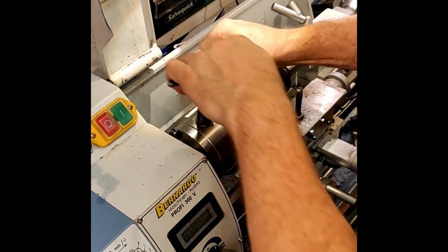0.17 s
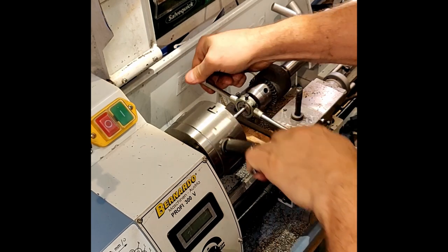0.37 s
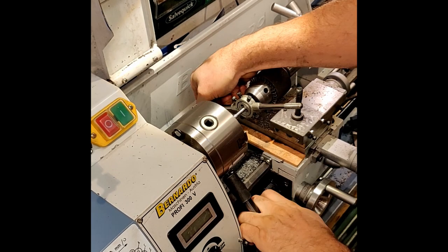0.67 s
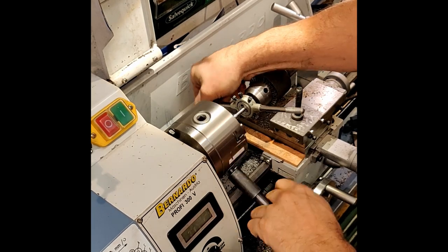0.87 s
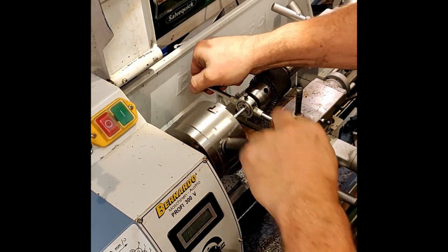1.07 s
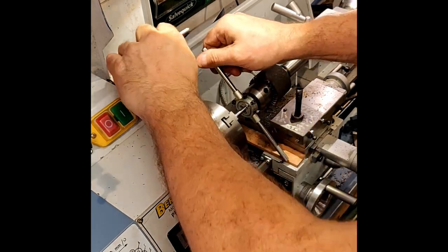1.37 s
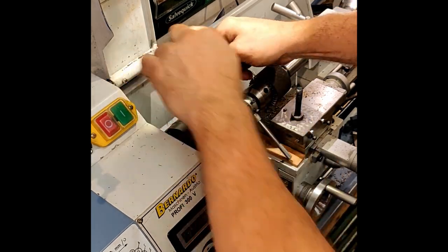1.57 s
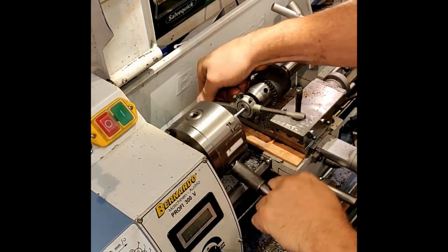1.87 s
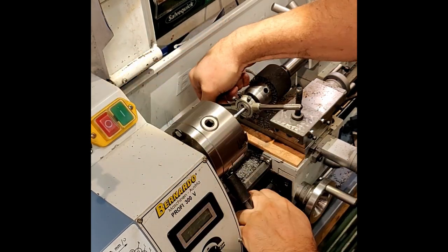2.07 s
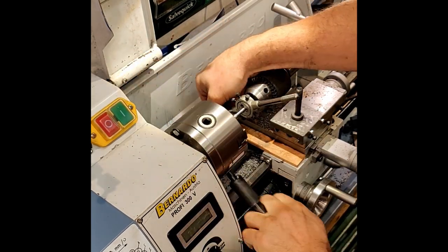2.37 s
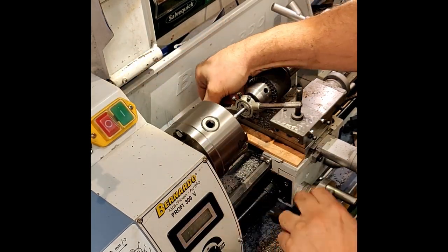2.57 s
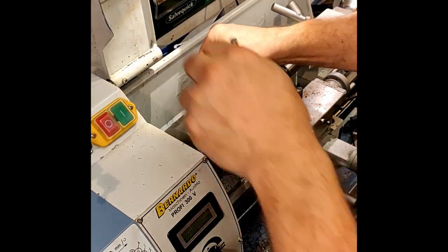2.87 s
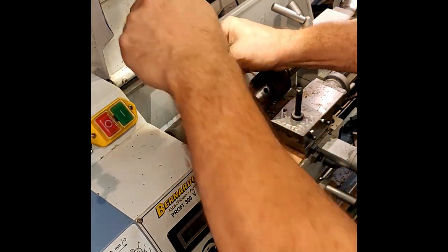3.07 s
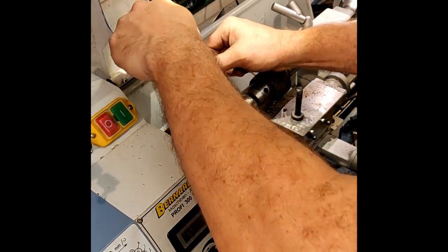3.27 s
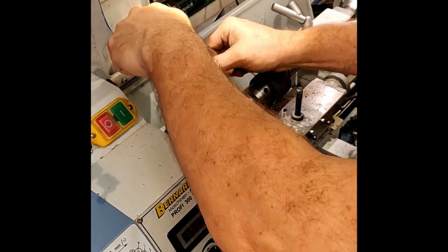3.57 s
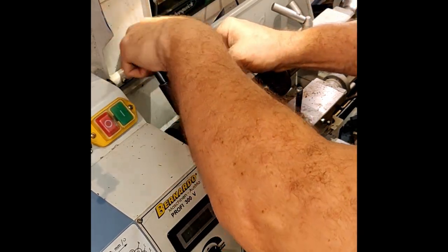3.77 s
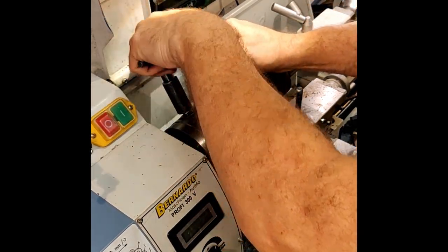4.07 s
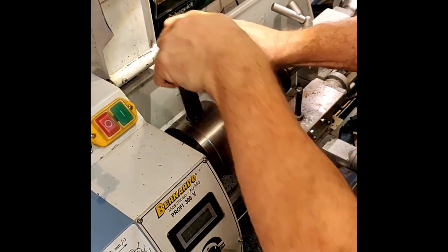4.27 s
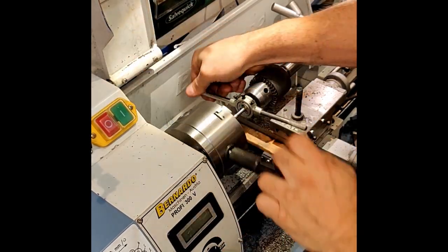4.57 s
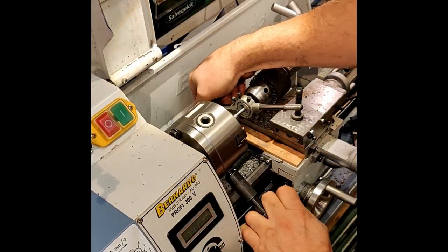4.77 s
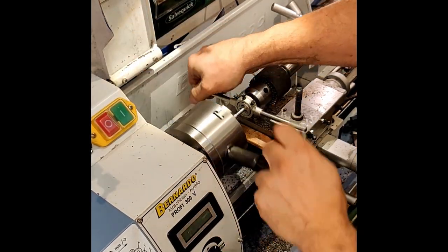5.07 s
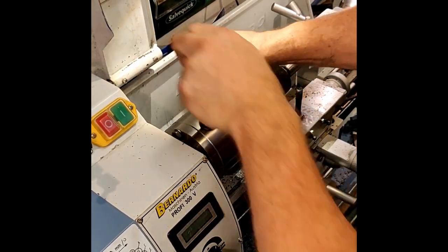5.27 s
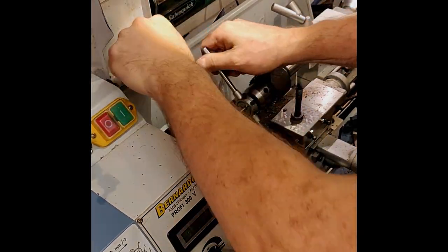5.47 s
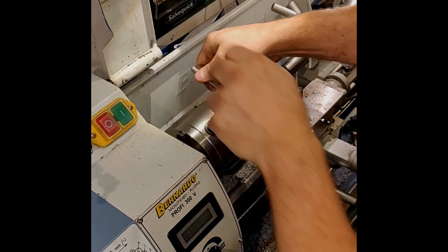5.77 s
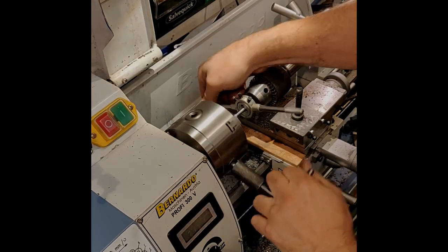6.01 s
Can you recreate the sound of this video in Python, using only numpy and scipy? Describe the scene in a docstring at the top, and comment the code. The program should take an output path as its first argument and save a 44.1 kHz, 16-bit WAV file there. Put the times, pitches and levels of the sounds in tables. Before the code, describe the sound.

Irregular sharp metal clacks with brief bright ringing and dull hollow booms, loose steel tapping and faint rubbing hiss, close up in a workshop.

```python
"""A thread is cut by hand on a stopped lathe in a small, dry workshop, one hand on the die, one on the key.
The key knocks, clacks home and scrapes; struck steel rings, and the headstock booms in its low modes.
From the start the die hisses by dense stick and slip at each turn; loose steel taps during turns and between.
Near 0.8 s the die rasps and whistles for a moment; short pings, further turns and blows follow to the end.
Still air and low microphone rumble lie under everything."""
import sys
import numpy as np
from scipy import signal
from scipy.fft import rfft, irfft
from scipy.io import wavfile

SR = 44100
rng = np.random.default_rng(int(sys.argv[2]) if len(sys.argv) > 2 else 0)


def materialize(psi):
    """Save the field psi as 16-bit PCM at rate SR to the path in sys.argv[1].

    A 1-D psi becomes a single channel; in a 2-D psi each row is a channel.
    """
    bounded = np.clip(np.atleast_2d(psi).T, -1, 1)
    quanta = np.round(bounded * 32767).astype(np.int16)
    wavfile.write(sys.argv[1], SR, quanta)


N = 270774
TIME = np.arange(N) / SR  # seconds through the scene
AGE = np.arange(SR // 2) / SR  # seconds since a blow
EDGE_HZ = 16200  # upper band limit

# Event levels are relative: each source function adds its own trims in dB.
# The key strikes home: start_s, steel_db, ring_centre_hz, boom_db, boom_pitch_hz, crack_db, left_minus_right_db
KEY_CLACKS = [(0.0942, -13, 6410, -32, 326, -33.5, 1.5), (1.3493, -8, 6430, -31, 460, -31.5, 5),
              (3.0996, -13, 6080, -31, 326, -34, 3.5), (3.8766, -21, 5200, -26, 292, -33, 4.5),
              (4.219, -30, 6160, -42.5, 410, -39.5, 2.5), (5.507, -7, 6500, -31, 363, -29.5, 1.5)]
# The key shifts in its socket: start_s, boom_db, boom_pitch_hz, crack_db
KEY_KNOCKS = [(0.002, -26, 198, -46.5), (0.816, -31, 306, -53), (1.05, -43.5, 270, -53),
              (1.557, -24, 297, -46), (2.148, -31.5, 236, -40), (2.333, -43.5, 204, -71),
              (2.383, -40, 242, -78), (3.454, -29, 276, -47.5), (3.58, -39, 282, -42),
              (3.634, -31, 393, -40), (3.782, -25.5, 265, -42), (4.087, -38, 256, -78),
              (4.168, -30, 221, -59.5), (4.405, -40, 276, -68), (4.831, -32.5, 200, -59),
              (4.948, -34.5, 287, -58.5), (5.008, -26, 186, -40), (5.028, -28.5, 199, -61),
              (5.2, -31.5, 222, -58), (5.568, -24, 198, -46.5), (5.942, -39, 199, -60.5)]
# After a knock the key drops back once, more softly
REBOUND_S, REBOUND_DB = 0.029, -9.5
# The key touches the chuck, too lightly to shake the headstock: start_s, level_db
KEY_TOUCHES = [(1.493, -57), (2.303, -60), (4.53, -54), (5.128, -55), (5.457, -58)]
# The key rings briefly as it shifts or leaves a socket: start_s, pitch_hz, level_db, t60_s
KEY_PINGS = [(1.053, 7300, -51, 0.076), (1.575, 5860, -51, 0.18), (1.627, 4740, -51.5, 0.11),
             (3.641, 3500, -41.5, 0.033), (5.009, 7350, -36, 0.097), (5.752, 4710, -54, 0.16)]
# The key drags along a socket wall: start_s, length_s, boom_db, grit_db
WALL_SCRAPES = [(0.0, 0.068, -41, -58), (0.821, 0.046, -39, -51.5), (2.43, 0.03, -43.5, -48),
                (3.459, 0.16, -39, -61.5), (3.602, 0.068, -36.5, -49.5), (3.791, 0.036, -31.5, -42.5),
                (3.844, 0.048, -32.5, -81), (4.172, 0.063, -44, -79), (4.997, 0.014, -44, -32.5),
                (5.52, 0.068, -35, -57)]
# Loose steel taps, during the turns and between them: start_s, tap_db, thin_ring_db
LOOSE_TAPS = [(0.077, -38.5, -42.5), (0.615, -47, -80), (0.6947, -48.5, -73), (0.856, -39.5, -54),
              (1.724, -40.5, -57.5), (1.7836, -46.5, -74), (1.9449, -40, -55.5), (2.0502, -43.5, -65),
              (2.0941, -43, -54.5), (2.4371, -41, -53), (4.1826, -41.5, -61), (4.7825, -40, -70),
              (4.9832, -39.5, -44), (5.2703, -47, -59), (6.0005, -43.5, -75), (6.1045, -44, -59.5)]
# Loose steel taps after a knock: delay_s, tap_db, thin_ring_db (levels relative to boom_db)
KNOCK_JOLT_OFFSET = (0.018, -19, -35)
# Loose steel taps after a clack: delay_s, tap_db, thin_ring_db (levels relative to boom_db)
CLACK_JOLT_OFFSET = (.034, -17.5, -29.5)
# Faint chatter of loose steel at random moments of each turn, levels relative to the turn
CHATTER_PER_S, CHATTER_DB, CHATTER_RING_DB, CHATTER_SPREAD_DB = 14, 3, -11, 2
# The chuck is pulled round and the die rubs on the rod: start_s, length_s, level_db
CHUCK_TURNS = [(0.0, 0.87, -60.5), (0.76, 0.46, -59), (1.52, 0.41, -60.5), (2.58, 0.64, -62.5),
               (4.32, 0.56, -59.5), (5.03, 0.6, -61.5), (5.72, 0.31, -58)]
TURN_ATTACK_S, TURN_RELEASE_S = 0.07, 0.17
CREEP_DB = -69.5  # between turns the die barely moves
# The die rasps and sings where it bites hardest: time_s, pitch_hz, level_db
DIE_SQUEAK = [(.82, 6500, -59), (0.889, 6680, -58), (0.972, 6670, -56.5), (1.021, 6550, -60.5),
              (1.12, 6330, -67)]
# Handling rumble through the scene: time_s, level_db
RUMBLE_LEVEL = [(0.0, -45), (0.58, -48.5), (2.22, -46), (2.77, -54.5), (5.3, -43.5), (5.44, -46),
                (5.68, -38.5), (6.14, -48.5)]

# Modes of the headstock and its sheet-metal covers: pitch_hz, level_db, t60_s
HEADSTOCK_MODES = [(189.4, -15, 0.099), (200, 4.5, 0.2), (257.6, 2.5, 0.12), (277.1, 1.5, 0.24),
                   (332, -15, 0.21), (403.8, 5, 0.15), (436, -29, .1), (560, -29, 0.15), (589, -0.5, 0.4),
                   (600, -13.5, .14), (713, -14.5, 0.48)]
# Modes of the key and chuck jaws: pitch_hz, level_db, t60_s
STEEL_MODES = [(5855, -12, 0.053), (5770, -1, 0.13), (5700, -12, 0.36), (6200, 21.5, 0.047),
               (6200, 13.5, 0.16), (6640, -5.5, .14), (7500, -23, .15), (7300, -3.5, .13),
               (7550, -19.5, 0.069)]

# Burst of struck steel: ratio to the ring centre (no unit), gain_db
BURST_COLOUR = [(.3, -61), (.72, -57), (.8, -38.5), (.87, -4), (.95, -3), (1.08, -3), (1.18, -10),
                (1.25, -20.5), (1.35, -33), (1.65, -50), (1.85, -42), (2.4, -47)]
# Snap of steel on steel: frequency_hz, gain_db
CRACK_COLOUR = [(150, -46), (500, 3.5), (1000, 8.5), (1800, 4.5), (3300, 8.5), (4300, 4.5), (6000, 11),
                (7500, 5.5), (9000, -11.5), (10500, -43.5), (12000, -15), (16000, -26)]
# Upper body of a hard blow: frequency_hz, gain_db
CLUNK_COLOUR = [(150, -32), (380, -18.5), (560, 8), (700, -12.5), (830, -7.5), (1050, -8), (1400, -10.5),
                (4000, -55.5)]
# Dull thud of the headstock: frequency_hz, gain_db
THUD_COLOUR = [(40, -20), (140, -21.5), (200, -0.5), (290, 2.5), (420, -13.5), (520, -13.5), (640, -9),
               (800, -24), (1500, -25.5), (4000, -74)]
# Tap of loose steel: frequency_hz, gain_db
TAP_COLOUR = [(100, -20), (300, 10), (520, 2.5), (750, 3), (1100, 5.5), (1800, 4), (2300, -7.5),
              (3200, -18.5), (5000, -15), (6500, -7.5), (8000, -34.5), (11000, -57.5)]
# Hiss of the die: frequency_hz, gain_db
RUBBING_COLOUR = [(300, -14.5), (1200, -12), (3000, -17), (4600, -11), (6500, -8.5), (7500, -14),
                  (9000, -33), (12000, -33.5)]
# Rasp of the biting die: frequency_hz, gain_db
RASP_COLOUR = [(2500, -41), (3900, -9), (4600, -2), (6600, 1), (7400, -6), (8500, -31)]
# Still room air: frequency_hz, gain_db
AIR_COLOUR = [(20, -13.5), (45, -14), (80, -19), (130, -31), (200, -8.5), (300, -14.5), (430, -12),
              (700, -20), (1500, -26.5), (3000, -27.5), (7000, -27.5), (10000, -39), (12500, -36.5),
              (16000, -36.5)]
# Microphone rumble: frequency_hz, gain_db
RUMBLE_COLOUR = [(8, 7), (20, 1), (50, -7), (90, -15.0), (160, -25.0), (500, -63.5)]


def amp(db):
    """Decibel law: 20 dB is a factor of ten in amplitude."""
    return 10 ** (np.asarray(db) / 20)


def unit(x):
    """Power normalisation: scales a steady sound to rms 1."""
    return x / np.sqrt(np.mean(x ** 2) + 1e-20)


def unit_hit(x):
    """Energy normalisation: scales a blow to the energy of 20 ms at rms 1."""
    energy = np.mean(np.sum(x ** 2, -1))
    return x / np.sqrt(energy / (SR / 50) + 1e-20)


def pan(db):
    """Interaural level difference: left and right gains that differ by db."""
    return amp([[db / 2], [-db / 2]])


def add(mix, s, sound):
    """Superposition: adds a stereo sound at time s, in place."""
    part = mix[:, max(round(s * SR), 0):][:, :sound.shape[-1]]
    part += sound[..., :part.shape[1]]


def colour(x, points, size=4096):
    """Minimum-phase filtering: a causal response derived from the log gain at the given points."""
    hz, db = np.transpose(points)
    grid_hz = abs(np.fft.fftfreq(size, 1 / SR)) + 1
    log_gain = np.log(amp(np.interp(np.log(grid_hz), np.log(hz), db)))
    # the Hilbert transform of the log gain gives the causal phase
    response = np.exp(np.conj(signal.hilbert(log_gain)))
    impulse = np.fft.ifft(response).real[:size // 2]
    return signal.oaconvolve(x, impulse[None], axes=1)[:, :x.shape[1]]


def noise(count, shared_hz=1100):
    """Spatial coherence: noise at two close microphones is alike in the bass, unrelated in the treble."""
    left, other = rfft(rng.standard_normal((2, count)))
    same = 1 / (1 + (np.fft.rfftfreq(count, 1 / SR) / shared_hz) ** 4)
    right = same * left + np.sqrt(1 - same ** 2) * other
    return irfft(np.array([left, right]), count)


def arrival(near_db, room_db, room_t60, near_t60=0.056, gap=0.00032):
    """Impulse response: direct sound, then scattering by the machine and decaying room reflections."""
    direct = np.zeros((2, len(AGE)))
    direct[0, 0] = direct[1, 2] = 1  # left leads by two samples
    scatter = noise(len(AGE), shared_hz=814) * (1 - np.exp(-(AGE / gap) ** 2))
    near = unit_hit(scatter * amp(-60 * AGE / near_t60))
    reflections = noise(len(AGE), shared_hz=600) * (AGE > gap)
    room = unit_hit(reflections * amp(-60 * AGE / room_t60))
    return unit_hit(direct) + amp(near_db) * near + amp(room_db) * room


def ring(modes, spread, vary_db):
    """Modal superposition: dying sines, reweighted at each blow; spread (radians) parts the two sides."""
    out = 0
    for k, (hz, db, t60) in enumerate(modes):
        phase = k * np.pi + spread * rng.standard_normal((2, 1))  # alternating sign
        decay = amp(db + vary_db * rng.standard_normal() - 60 * AGE / t60)
        out = out + decay * np.sin(2 * np.pi * hz * AGE + phase)
    return unit_hit(out)


def slips(count, per_s, uneven_db):
    """Stick and slip: friction yields a random train of small jerks of unequal size."""
    size_db = uneven_db * np.minimum(rng.exponential(1, count), 3)
    size = amp(size_db) * rng.choice([-1, 1], count)
    happens = rng.random(count) < per_s / SR
    return (size * happens)[None]


def clacks(burst_db=-10, modes_db=-21, boom_db=-2, clunk_db=-5, crack_db=-1):
    """Hard impact: short contact excites a burst, lingering steel modes, a snap, a clunk and the boom."""
    out = np.zeros((2, N))
    for s, db, hz, low_db, low_hz, snap_db, side_db in KEY_CLACKS:
        heard = arrival(near_db=-2, room_db=-4, room_t60=0.16, near_t60=0.035, gap=0.0012)
        burst = unit_hit(colour(heard, np.multiply(BURST_COLOUR, [hz, 1])))
        modes = ring(STEEL_MODES, spread=1.2, vary_db=2.5) * (1 - np.exp(-AGE / 0.002))
        steel = amp(burst_db) * burst + amp(modes_db) * modes
        snap = amp(crack_db) * crack(wet_db=-1)
        # only a short, hard contact reaches the upper modes of the casting
        casting = arrival(near_db=6, room_db=8, room_t60=0.16, gap=0.002)
        clunk = amp(clunk_db) * unit_hit(colour(casting, CLUNK_COLOUR))
        add(out, s, pan(side_db) * (amp(db) * steel + amp(snap_db) * (snap + clunk)))
        add(out, s, amp(low_db + boom_db) * boom(low_hz))
    return out


def boom(hz, rise=0.00067, focus_db=12, modes_db=-1, thud_db=-5, modes_side_db=5.0, thud_side_db=2):
    """Modal excitation: the place of the blow favours headstock modes near hz, over a dull thud."""
    # focus_db is lost per octave away from hz
    favoured = [(f, db - focus_db * abs(np.log2(f / hz)), t60) for f, db, t60 in HEADSTOCK_MODES]
    modes = ring(favoured, spread=0.25, vary_db=1.5) * (1 - np.exp(-AGE / rise))
    heard = arrival(near_db=5.0, room_db=7.0, room_t60=0.33, gap=0.0037)
    thud = unit_hit(colour(heard, THUD_COLOUR))
    return pan(modes_side_db) * amp(modes_db) * modes + pan(thud_side_db) * amp(thud_db) * thud


def crack(wet_db=2):
    """Broadband impulse: steel meeting steel snaps over a wide spectrum."""
    heard = arrival(near_db=wet_db, room_db=wet_db + 3.5, room_t60=0.13)
    return unit_hit(colour(heard, CRACK_COLOUR))


def knocks(boom_db=-7, crack_db=0, side_db=3.0):
    """Soft impact: the key excites mostly the boom, with a small snap and one rebound."""
    out = np.zeros((2, N))
    for s, low_db, hz, snap_db in KEY_KNOCKS:
        snap = amp(snap_db + crack_db) * pan(side_db) * crack()
        add(out, s, amp(low_db + boom_db) * boom(hz) + snap)
        add(out, s + REBOUND_S, amp(low_db + boom_db + REBOUND_DB) * boom(hz))
    return out


def scrapes(boom_hz=280):
    """Friction as repeated impact: runs of slips shake the headstock and crackle."""
    out = np.zeros((2, N))
    for s, length, low_db, grit_db in WALL_SCRAPES:
        stroke = np.sqrt(np.maximum(np.sin(np.pi * np.minimum(AGE / length, 1)), 0))
        jerks = slips(len(AGE), per_s=700, uneven_db=1.5) * stroke
        for db, body in ((low_db, boom(boom_hz)), (grit_db, crack())):
            sound = signal.fftconvolve(jerks, body, axes=1)
            stroke_rms = np.sqrt(np.sum(sound ** 2) / (2 * length * SR) + 1e-20)
            add(out, s, amp(db) * sound / stroke_rms)
    return out


def pings():
    """Single-mode decay: one mode of the key, roughened by its reflections."""
    out = np.zeros((2, N))
    for s, hz, db, t60 in KEY_PINGS:
        tone = ring([(hz, 0, t60)], spread=0.7, vary_db=0)
        path = arrival(near_db=6, room_db=6, room_t60=t60)
        echoes = signal.fftconvolve(path, tone * np.exp(-AGE / 0.0015), axes=1)
        add(out, s, amp(db) * unit_hit(tone + 0.5 * unit_hit(echoes[:, :len(AGE)])))
    return out


def touches(side_db=3.5):
    """Light contact: small dry snaps of the key on the chuck, without the boom."""
    out = np.zeros((2, N))
    for s, db in KEY_TOUCHES:
        add(out, s, amp(db) * pan(side_db) * crack(wet_db=0.5))
    return out


def die(side_db=2.5, chips_db=-2, murmur_db=-62):
    """Sliding friction: fine, dense slips hiss, and the same rubbing murmurs through the headstock."""
    rub = rubbing()
    chip = arrival(near_db=3, room_db=0, room_t60=0.13)
    chips = signal.oaconvolve(slips(N, per_s=170, uneven_db=1), chip, axes=1)[:, :N]
    hiss = unit(colour(noise(N) + amp(chips_db) * unit(chips), RUBBING_COLOUR))
    shudder = colour(slips(N, per_s=200, uneven_db=3.5) * noise(N), THUD_COLOUR)
    murmur = amp(murmur_db) * unit(shudder * np.sqrt(rub))
    return pan(side_db) * (rub * hiss + murmur)


def rubbing():
    """Friction follows speed: its level rises, holds and eases off with each turn, above a slow creep."""
    level = np.full(N, amp(CREEP_DB))
    for s, length, db in CHUCK_TURNS:
        gather = (TIME - s) / TURN_ATTACK_S
        ease = (s + length - TIME) / TURN_RELEASE_S
        speed = np.clip(np.minimum(gather, ease), 0, 1)
        level = np.maximum(level, amp(db) * np.sqrt(speed))
    return level


def squeak(width_hz=350, rasp_db=5, whistle_db=-3):
    """Frictional singing: the cutting edge gives a grainy rasp around a thin, unsteady whistle."""
    s, hz, db = np.transpose(DIE_SQUEAK)
    lowpass = signal.butter(2, width_hz / 2, fs=SR, output="sos")
    waver = unit(signal.sosfilt(lowpass, rng.standard_normal((2, N))))
    # slow noise on a sine makes a narrow band, width_hz wide
    whistle = waver * np.sin(2 * np.pi * np.cumsum(np.interp(TIME, s, hz)) / SR)
    grains = unit(slips(N, per_s=900, uneven_db=0.5) * noise(N))
    rasp = unit(colour(noise(N) + grains, RASP_COLOUR))
    level = np.interp(TIME, s, amp(db), left=0, right=0)
    return (amp(whistle_db) * whistle + amp(rasp_db) * rasp) * level


def taps(tap_db=-3, ring_db=-4, ring_hz=5850, side_db=2):
    """Reflected impact: hollow taps of loose steel, strong in reflections, each with a thin ring."""
    out = np.zeros((2, N))
    for s, db, thin_db in [*LOOSE_TAPS, *jolts(), *chatter()]:
        heard = arrival(near_db=10, room_db=10.5, room_t60=0.2, gap=0.003)
        tap = unit_hit(colour(heard, TAP_COLOUR))
        thin = ring([(ring_hz, 0, 0.14), (5720, -6, 0.09)], spread=1, vary_db=2)
        add(out, s, pan(side_db) * (amp(db + tap_db) * tap + amp(thin_db + ring_db) * thin))
    return out


def jolts():
    """Transmitted shock: each blow sets off a delayed tap; rows of start_s, tap_db, thin_ring_db."""
    knocked = [np.add((s, db, db), KNOCK_JOLT_OFFSET) for s, db, _, _ in KEY_KNOCKS]
    clacked = [np.add((s, db, db), CLACK_JOLT_OFFSET) for s, _, _, db, *_ in KEY_CLACKS]
    return knocked + clacked


def chatter():
    """Random excitation: faint taps scatter over each turn; rows of start_s, tap_db, thin_ring_db."""
    rows = []
    for s, length, db in CHUCK_TURNS:
        for place, size in rng.random((round(CHATTER_PER_S * length), 2)):
            level = db + CHATTER_SPREAD_DB * (2 * size - 1)
            rows.append((s + place * length, level + CHATTER_DB, level + CHATTER_RING_DB))
    return rows


def workshop(air_db=-60, rumble_db=1):
    """Filtered noise: still room air and the low rumble of a hand-held microphone."""
    rumble = unit(colour(noise(N, shared_hz=139.3), RUMBLE_COLOUR))
    air = amp(air_db) * unit(colour(noise(N, shared_hz=654), AIR_COLOUR))
    handling = amp(np.interp(TIME, *np.transpose(RUMBLE_LEVEL)) + rumble_db)
    return pan(2.1) * (air + rumble * handling)


def scene():
    """Superposition of all sources at the two microphones."""
    key = clacks() + knocks() + scrapes() + pings() + touches()
    return key + die() + squeak() + taps() + workshop()


def record(dry):
    """Band limitation: a linear-phase low-pass removes what lies above EDGE_HZ."""
    lowpass = signal.firwin(255, EDGE_HZ, window=("kaiser", 9), fs=SR)
    return signal.oaconvolve(dry, lowpass[None], "same")


dry = scene()
out = record(dry)
materialize(out)
```